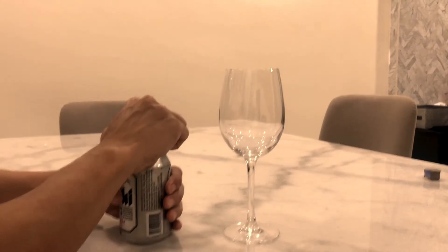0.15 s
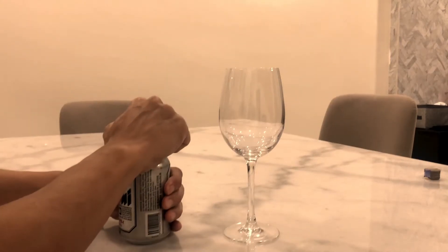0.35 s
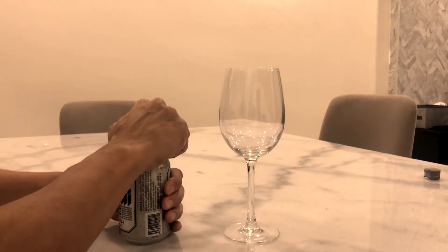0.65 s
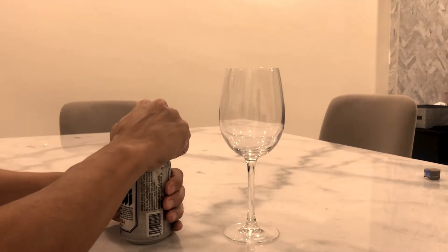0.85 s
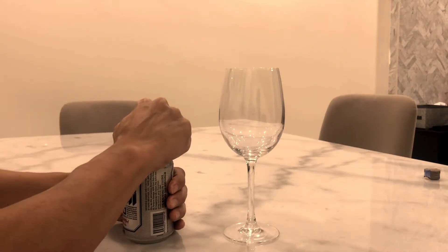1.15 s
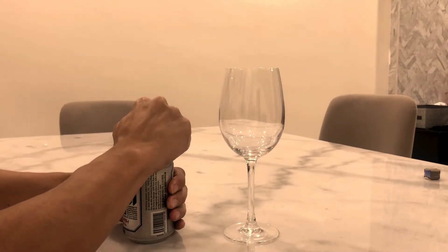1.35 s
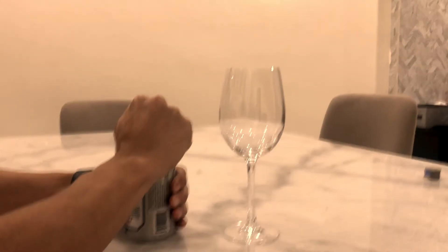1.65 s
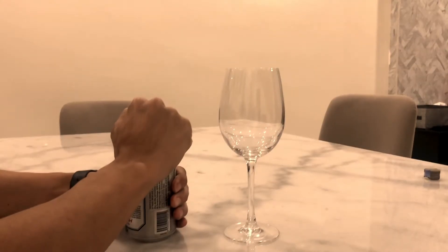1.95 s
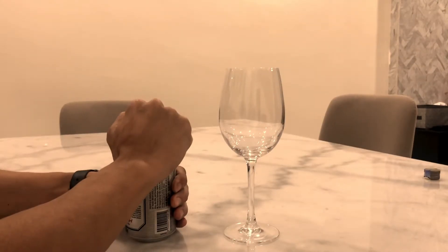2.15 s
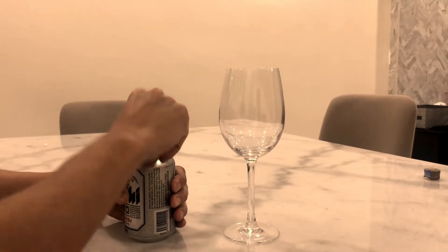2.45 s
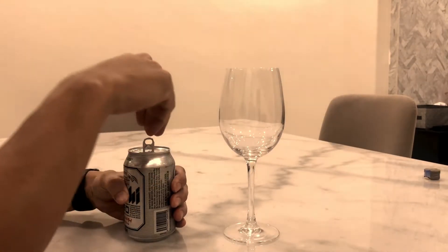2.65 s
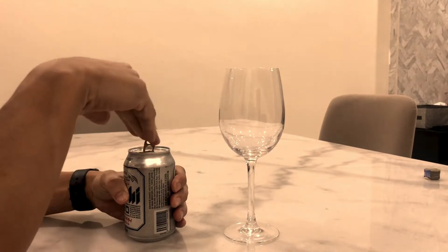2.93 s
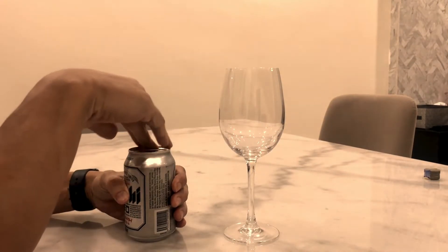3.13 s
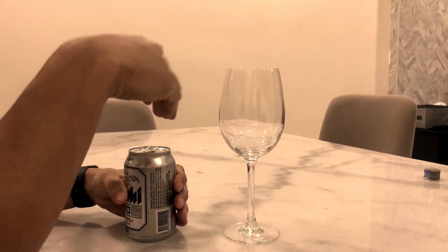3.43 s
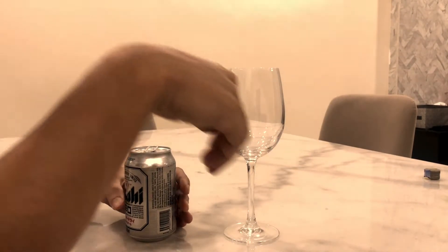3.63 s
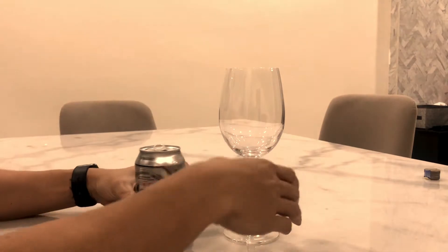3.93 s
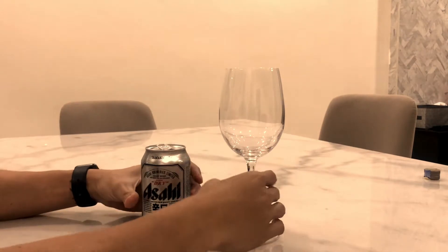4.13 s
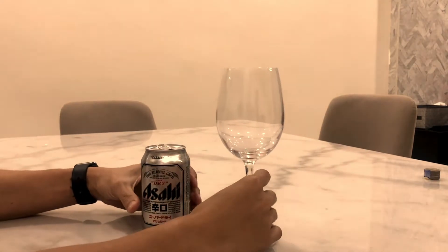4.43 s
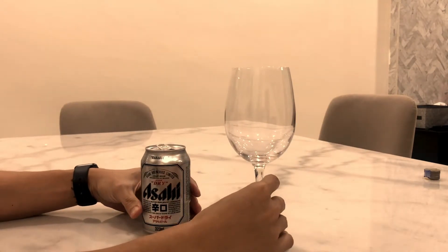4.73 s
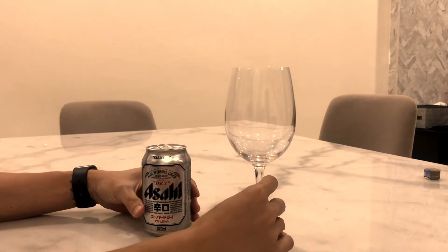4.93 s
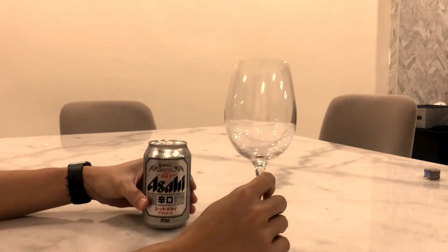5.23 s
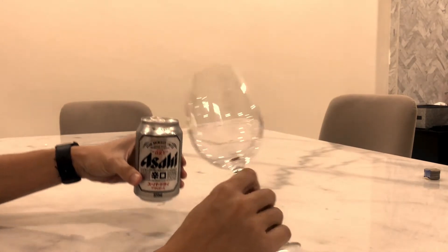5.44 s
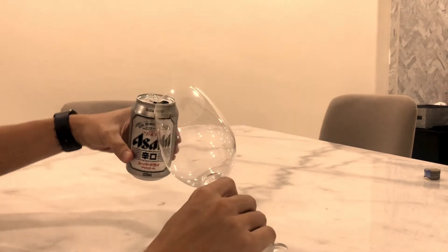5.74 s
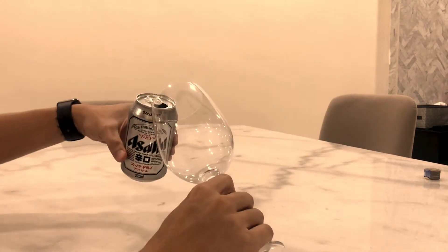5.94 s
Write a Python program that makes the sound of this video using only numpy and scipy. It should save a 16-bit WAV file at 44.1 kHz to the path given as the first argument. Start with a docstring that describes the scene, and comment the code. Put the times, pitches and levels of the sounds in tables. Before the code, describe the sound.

A beer can clicks, hisses and cracks open, then a wine glass slides and knocks lightly on a stone table in an echoing room.

```python
"""In a bare, echoing dining room with humming ventilation, a beer can is opened close by on a stone table.
The tab bends the lid with sharp clicks and gas hisses through the crack. The lid tears open, making
the can ring, and the tab is pressed flat. Then a wine glass is pushed over the table: its foot sticks,
slips and knocks, its bowl sings faintly, and it tips and turns on the edge of its foot."""
import sys
import numpy as np
from scipy import signal
from scipy.fft import rfft, irfft
from scipy.io import wavfile

SR = 44100
rng = np.random.default_rng(int(sys.argv[2]) if len(sys.argv) > 2 else 0)


def wav_out(sig):
    """Save sig, one row per channel (or a flat mono array), as 16-bit PCM at SR to the path in sys.argv[1]."""
    wavfile.write(sys.argv[1], SR, np.round(np.clip(np.atleast_2d(sig).T, -1, 1) * 32767).astype(np.int16))


N = 268128
TIME = np.arange(N) / SR
BRIGHT_HZ = 2050   # a body's tones are called "hollow" below this and "bright" above it

# The tones each body rings with; ring time is how long a tone takes to fade by 60 dB:
# (frequency [Hz], level [dB], ring time [s])
SEALED_LID_TONES = [(1218, -18.5, .005), (1629, -10.5, .0062), (2040, -13, 0.004), (3377, -7.5, .021),
                    (3890, -2.5, .011), (4460, -9, 0.0087), (6276, -17, .007), (6750, -15.5, .0065),
                    (7700, -18.5, .007)]
OPEN_CAN_TONES = [(810, -9, 0.0096), (930, -1.5, 0.019), (1010, -8.5, 0.012), (1140, -15, 0.025),
                  (1984, -13.5, .008), (2713, -8, 0.0039), (3640, -3, 0.011), (3950, 1.5, 0.0035),
                  (4347, -4, .007), (4680, -10, 0.013), (5170, -12, 0.007)]
TABLE_TONES = [(98.2, -1.5, .09), (217, -7.5, 0.0495), (356, 1.5, .03)]
LOOSE_TAB_TONES = [(1143, -0.5, 0.037), (2780, 0.5, .0055), (4400, -2, 0.0045), (5700, -6, 0.0045),
                   (6600, -9, 0.0048), (7400, -4.5, 0.005), (12300, -8, .008)]
PRESSED_CAN_TONES = [(214, -13.5, 0.36), (296, -7.5, 0.067), (389, -6.5, 0.095), (820, 0.5, 0.016),
                     (1132, -1.5, 0.026), (2960, -10, .015)]
GLASS_FOOT_TONES = [(123, -24, 0.089), (201, -17, 0.1), (294, -19, 0.078), (376, -13.5, 0.048),
                    (687, 0, 0.043), (799, -2.5, 0.028), (1017, -8.5, 0.017), (2060, -12.5, 0.016),
                    (2600, -4, 0.013), (4060, -9.5, 0.0027), (5320, -19.5, .028), (6760, -14.5, 0.01),
                    (9230, -26, 0.045), (10300, -22, .025), (14100, -9.5, 0.017), (14120, -11, 0.018)]
GLASS_BOWL_TONES = [(2557, -16, .25), (4893, 0, .7), (9189, -14, .4)]
TIPPED_GLASS_TONES = [(303, -13.5, 0.14), (671, -0.5, 0.054), (896, -3.5, 0.06), (2030, -11, 0.015),
                      (2670, -11, 0.011), (4800, -18.5, 0.052), (5740, -4, 0.0097), (6100, -7, 0.013),
                      (8300, -20, .03), (8900, -16, 0.02), (10100, -28, .02)]

# The colour of each noise, or how strong it is from bass to treble: (frequency [Hz], level [dB])
VENTILATION_COLOUR = [(15, -66.5), (25, -44), (55, -13), (102, -16), (141, 0), (170, -4), (309, -4.5),
                      (695, -14.5), (775, -11), (1160, -15), (2690, -32), (4030, -32), (5280, -38),
                      (14400, -46.5), (16000, -59)]
METAL_CRACK_COLOUR = [(40, -43), (200, -19), (1000, -13), (1800, -7.5), (2750, -10.5), (3450, 0.5),
                      (5000, 3.5), (5800, -2), (6700, -0.5), (8000, -6.5), (10500, -3.5), (13000, -7.5),
                      (16000, -12.5)]
FIRST_GAS_COLOUR = [(410, -50), (700, -22), (819, -17.5), (886, -25), (1060, -17), (1600, -10), (2880, -20),
                    (3790, -5), (5760, -8), (6570, -4), (7600, -11), (9250, 0), (10900, -5.5), (13000, -4),
                    (15200, -6.5), (16000, -7)]
LAST_GAS_COLOUR = [(200, -30), (1000, -14), (1700, -1), (2750, -12.5), (3150, -1.5), (3420, 10.5),
                   (3850, -1), (4600, -2), (5400, -6), (6600, 1.5), (9500, -7.5), (13000, -12.5),
                   (16000, -23.5)]
TEAR_COLOUR = [(25, -54), (70, -36), (130, -20), (380, -5.5), (550, -10), (950, 3), (1350, -9.5),
               (1900, 0.5), (2900, -9), (3550, 5), (4300, 3), (5100, -2.5), (5500, -13), (7500, -12.5),
               (10000, -8.5), (16000, -24)]
STONE_CRACK_COLOUR = [(40, -16), (200, -15), (1000, -8), (3500, -5), (4700, -5), (6700, -3.5), (9000, -6),
                      (11500, -15.5), (14000, -5), (16000, -4)]
ROOM_COLOUR = [(100, -8.5), (400, 2), (1000, -4), (2000, -2.5), (4000, -4), (8000, -1.5), (15000, -6)]

# The lid snaps, the first time at a higher pitch while the can is tight with gas:
# (time [s], hollow level [dB], bright level [dB], crack level [dB], pitch [factor], room level [dB])
LID_CLICKS = [(0.6989, -44.5, -16, -25.5, 1.04, -4.5), (0.9164, -2.7, -7.5, -33.5, 1, 3),
              (1.1938, -10.5, -13.5, -17, 1, -3.5)]
# The strained rivet that holds the tab ticks: (time [s], level [dB])
RIVET_TICKS = [(1.1890, -34), (1.3174, -36), (1.345, -39.5), (1.3730, -44), (1.5066, -35), (1.5132, -38),
               (1.523, -28)]
# The flap breaks in, swings down and settles:
# (time [s], hollow level [dB], bright level [dB], crack level [dB], pitch [factor])
FLAP_CLICKS = [(1.5422, -11, -8.5, -13.5, .96), (1.5570, -23, -17, -20, 0.9),
               (1.5662, -7, -14.5, -33.5, 1.02), (1.6875, -50, -18.5, -45, 1),
               (2.2961, -39, -37.5, -61, 1.12)]
# Skin brushes over metal and stone: (time [s], level [dB], length [s], centre frequency [Hz])
SKIN_BRUSHES = [(2.313, -80, .034, 12000), (2.384, -59.5, .068, 2600), (2.406, -58, 0.041, 1000),
                (2.42, -70, 0.021, 9000), (3.45, -70, 0.007, 9000), (5.10, -81, .45, 10200),
                (5.394, -68, 0.059, 4300), (5.814, -80.5, .043, 6000)]
# The glass is pushed along in short shoves: (time [s], level [dB], hold [s])
GLASS_SHOVES = [(4.256, -51, .075), (4.368, -42, 0.026), (4.431, -39.5, 0.055)]
# The foot of the glass catches on the table: (time [s], level [dB])
GLASS_KNOCKS = [(4.2602, -42), (4.3237, -41), (4.3831, -30), (4.4358, -31.3), (4.4700, -33),
                (4.4935, -33.5)]
# Sound bounces off the nearest walls: (delay [s], level [dB])
WALL_ECHOES = [(.0021, -16), (.0107, -11), (0.0154, -10.5)]
# How long the room keeps ringing: (frequency [Hz], ring time [s])
ROOM_RING_TIMES = [(150, 1), (500, 0.85), (1000, 1.04), (2000, 1.16), (4700, 1.0), (6000, 0.82),
                   (9000, 0.63), (15000, 0.33)]


def from_db(db):
    """Turn decibels into a number to multiply a sound by."""
    return 10 ** (np.asarray(db) / 20)


def unit_power(x):
    """Scale a sound so that its average power is one."""
    return x / np.sqrt(np.mean(x ** 2) + 1e-20)


def at_hz(points, hz):
    """Read between the rows of a table, with every octave equally wide."""
    row_hz, value = np.transpose(points)
    return np.interp(np.log(np.maximum(hz, 1)), np.log(row_hz), value)


def coloured(x, colour):
    """Filter a sound to give it a colour."""
    size = 8192
    cepstrum = irfft(np.log(from_db(at_hz(colour, np.fft.rfftfreq(size, 1 / SR)))))
    # make the filter answer as early as it can (minimum phase), so clicks stay sharp
    cepstrum[1:size // 2] *= 2
    cepstrum[size // 2 + 1:] = 0
    response = irfft(np.exp(rfft(cepstrum)))[:size // 2]
    return signal.fftconvolve(x, response)[:len(x)]


def add(track, s, sound):
    """Mix a sound into a track, starting at s seconds."""
    start = int(round(s * SR))
    part = sound[..., :N - start]
    track[..., start:start + part.shape[-1]] += part


def ringing(tones, hollow_db=0, bright_db=0, pitch=1):
    """A struck body rings with fading tones; neighbouring tones swing in opposite directions."""
    t, out = TIME[:SR // 2], 0
    for k, (hz, db, ring_s) in enumerate(tones):
        strength = from_db(db + (hollow_db if hz < BRIGHT_HZ else bright_db)) * (-1) ** k
        out = out + strength * np.sin(2 * np.pi * hz * pitch * t) * np.exp(-np.log(1000) * t / ring_s)
    return out


def hit(s, hollow_db, bright_db, crack_db, tones, colour, crack_s, pitch=1):
    """One hit is a short crack of noise plus the ringing of the body."""
    out, fade = np.zeros(N), np.exp(-TIME[:SR // 2] / crack_s)
    noise = coloured(rng.standard_normal(len(fade)) * fade, colour)
    crack = unit_power(noise) * np.sqrt(np.mean(fade ** 2))
    add(out, s, ringing(tones, hollow_db, bright_db, pitch) + from_db(crack_db) * crack)
    return out


def shaken(tones, s, db):
    """A shaken body rings with no crack of its own."""
    out = np.zeros(N)
    add(out, s, from_db(db) * ringing(tones))
    return out


def slips(per_s, spread_db):
    """Tiny sudden slips of uneven size come at random moments."""
    kicks = (rng.random(N) < per_s / SR) * rng.choice([-1, 1], N)
    return kicks * from_db(spread_db * np.clip(rng.standard_normal(N), -2, 2))


def burst(s, db, rise_s, hold_s, fade_s):
    """Loudness over time: it rises, holds, then falls by 60 dB in fade_s."""
    t = TIME - s
    fallen = np.clip((t - rise_s - hold_s) / fade_s, 0, 2)
    return from_db(db) * np.clip(t / rise_s, 0, 1) * np.exp(-np.log(1000) * fallen)


def placed(x, room_db):
    """Split a sound into (straight to the ear, sent into the room)."""
    return np.outer([1, from_db(room_db)], x)


def cut_bass(x, below_hz):
    """The deep bass of the clicks, hiss and knocks is cut away."""
    return signal.sosfilt(signal.butter(3, below_hz, "high", fs=SR, output="sos"), x)


def room(x, onset_s, build_s, tail_db):
    """The walls give a few echoes, then a smooth tail whose treble dies first."""
    t = TIME[:SR * 3 // 2]
    noise, hz = rfft(rng.standard_normal(len(t))), np.fft.rfftfreq(len(t), 1 / SR)
    centres = np.geomspace(60, 16000, num=17)
    response = np.zeros(len(t))
    for centre, share in zip(centres, np.eye(len(centres))):
        band = irfft(noise * at_hz(np.column_stack([centres, share]), hz), len(t))
        fade = np.exp(-np.log(1000) * t / at_hz(ROOM_RING_TIMES, centre))
        response += band * from_db(at_hz(ROOM_COLOUR, centre)) * fade
    response *= from_db(tail_db) * np.clip((t - onset_s) / build_s, 0, 1)
    for delay, db in WALL_ECHOES:
        response[int(delay * SR)] += from_db(db)
    return signal.fftconvolve(x, response)[:N]


def ventilation(rush_db, hum_hz, hum_db):
    """Moving air makes a low rush with a faint, wavering hum."""
    rush = coloured(rng.standard_normal(N + SR), VENTILATION_COLOUR)[SR:]
    hum = signal.lfilter(*signal.iirpeak(hum_hz, Q=16, fs=SR), rng.standard_normal(N))
    return from_db(rush_db) * unit_power(rush) + from_db(hum_db) * unit_power(hum)


def lid_clicks():
    """The tab levers the sealed lid, which buckles in three loud snaps."""
    return sum(placed(hit(*click, SEALED_LID_TONES, METAL_CRACK_COLOUR, .0024, pitch), room_db)
               for *click, pitch, room_db in LID_CLICKS)


def gas_hiss(colour, loudness):
    """Gas jets through the cracked lid and dies away as the pressure falls."""
    return unit_power(coloured(rng.standard_normal(N), colour)) * loudness


def rivet_ticks(hollow_db, bright_db):
    """The rivet's ticks are mostly crack and barely ring the lid."""
    return sum(hit(s, db + hollow_db, db + bright_db, db, SEALED_LID_TONES, METAL_CRACK_COLOUR,
                   crack_s=.003) for s, db in RIVET_TICKS)


def flap_clicks():
    """Each jerk of the flap rings the opened can."""
    return sum(hit(*click, OPEN_CAN_TONES, METAL_CRACK_COLOUR, crack_s=.0012, pitch=pitch)
               for *click, pitch in FLAP_CLICKS)


def table_thump():
    """The jolt of the flap drives the can onto the table."""
    return shaken(TABLE_TONES, s=1.559, db=-42.5)


def lid_tear(ring_db):
    """The metal gives way along its groove in a rush of tiny breaks that keep the can ringing."""
    breaks = slips(per_s=3500, spread_db=5)
    ring = from_db(ring_db) * unit_power(signal.fftconvolve(breaks, ringing(OPEN_CAN_TONES))[:N])
    rip = unit_power(coloured(slips(per_s=3500, spread_db=4), TEAR_COLOUR))
    return (rip + ring) * burst(s=1.56, db=-25, rise_s=.0029, hold_s=.0179, fade_s=.2152)


def skin_brushes(width_octaves):
    """Skin rubs over metal and stone in soft swells of tiny slips."""
    out, grid_hz = np.zeros(N), np.geomspace(50, SR / 2, num=120)
    for s, db, length_s, centre_hz in SKIN_BRUSHES:
        count = int(length_s * SR)
        hump_db = np.maximum(-4 * (np.log2(grid_hz / centre_hz) / width_octaves) ** 2, -50)
        grains = coloured(slips(per_s=4600, spread_db=2.5)[:count], np.column_stack([grid_hz, hump_db]))
        swell = np.sin(np.pi * np.arange(count) / count)
        add(out, s, from_db(db) * unit_power(grains * swell))
    return out


def tab_flattening():
    """The loose tab snaps back down, then a fingertip presses it flat with a dull knock."""
    flick = hit(s=3.0637, hollow_db=-33, bright_db=-30.5, crack_db=-34.5,
                tones=LOOSE_TAB_TONES, colour=METAL_CRACK_COLOUR, crack_s=.001)
    press = hit(s=3.1035, hollow_db=-30.5, bright_db=-40, crack_db=-60,
                tones=PRESSED_CAN_TONES, colour=METAL_CRACK_COLOUR, crack_s=.0045)
    return placed(flick, room_db=-6) + placed(press, room_db=-4.5)


def glass_slide(grit_db, bright_db):
    """The foot of the glass sticks and slips on the stone, and each slip makes it ring."""
    judder = slips(per_s=600, spread_db=1)
    foot = unit_power(signal.fftconvolve(judder, ringing(GLASS_FOOT_TONES, bright_db=bright_db))[:N])
    grit = from_db(grit_db) * unit_power(coloured(judder, STONE_CRACK_COLOUR))
    push = sum(burst(s, db, rise_s=.015, hold_s=hold_s, fade_s=.14) for s, db, hold_s in GLASS_SHOVES)
    return (foot + grit) * push


def glass_knocks(bright_db, crack_db):
    """The foot catches on the stone: the harder the knock, the brighter it sounds."""
    firm_db, extra_treble_per_db = -30, 1.4
    out = 0
    for s, db in GLASS_KNOCKS:
        treble_db = db + extra_treble_per_db * (db - firm_db)
        out = out + hit(s, db, treble_db + bright_db, treble_db + crack_db,
                        GLASS_FOOT_TONES, STONE_CRACK_COLOUR, crack_s=.0046)
    return out


def bowl_ring():
    """The strongest judder climbs the stem and leaves the thin bowl singing."""
    return shaken(GLASS_BOWL_TONES, s=4.47, db=-62)


def glass_turn(bright_db):
    """Light slips ring the glass as it grinds round on the edge of its foot."""
    grinding = slips(per_s=700, spread_db=1.5)
    ring = signal.fftconvolve(grinding, ringing(TIPPED_GLASS_TONES, bright_db=bright_db))[:N]
    return unit_power(ring) * burst(s=5.029, db=-53.3, rise_s=.004, hold_s=.04, fade_s=.42)


def glass_tip():
    """The tipped glass taps the stone with the edge of its foot."""
    return hit(s=5.1902, hollow_db=-37.5, bright_db=-37, crack_db=-53,
               tones=TIPPED_GLASS_TONES, colour=STONE_CRACK_COLOUR, crack_s=.0017)


def scene():
    """Can and glass stand straight ahead, so both channels carry the same sound."""
    first_gas = burst(s=.708, db=-37.2, rise_s=.046, hold_s=.072, fade_s=.46)
    last_gas = burst(s=1.18, db=-42.5, rise_s=.0233, hold_s=.0141, fade_s=.66)   # the crack widens
    sounds = lid_clicks()
    sounds += placed(gas_hiss(FIRST_GAS_COLOUR, first_gas), room_db=-6.5)
    sounds += placed(gas_hiss(LAST_GAS_COLOUR, last_gas), room_db=-5.5)
    sounds += placed(rivet_ticks(hollow_db=-6, bright_db=-12), room_db=-1)
    sounds += placed(flap_clicks(), room_db=-1)
    sounds += placed(table_thump(), room_db=-4)
    sounds += placed(lid_tear(ring_db=-5), room_db=1.5)
    sounds += placed(skin_brushes(width_octaves=.7), room_db=.5)
    sounds += tab_flattening()
    sounds += placed(glass_slide(grit_db=-36, bright_db=-7.5), room_db=-3)
    sounds += placed(glass_knocks(bright_db=-3, crack_db=-9), room_db=-1)
    sounds += placed(bowl_ring(), room_db=-10)
    sounds += placed(glass_turn(bright_db=-14.5), room_db=-1.5)
    sounds += placed(glass_tip(), room_db=-4.5)
    direct, sent = cut_bass(sounds, below_hz=90)
    echoes = room(sent, onset_s=.005, build_s=.0055, tail_db=-37)
    mono = direct + echoes + ventilation(rush_db=-59, hum_hz=145.3, hum_db=-71.5)
    return np.stack([mono, mono])


def record(dry):
    """The very highest treble is cut off steeply."""
    cutoff_hz = 15800
    return signal.sosfilt(signal.ellip(10, .1, 70, cutoff_hz, fs=SR, output="sos"), dry)


dry = scene()
out = record(dry)
wav_out(out)
```